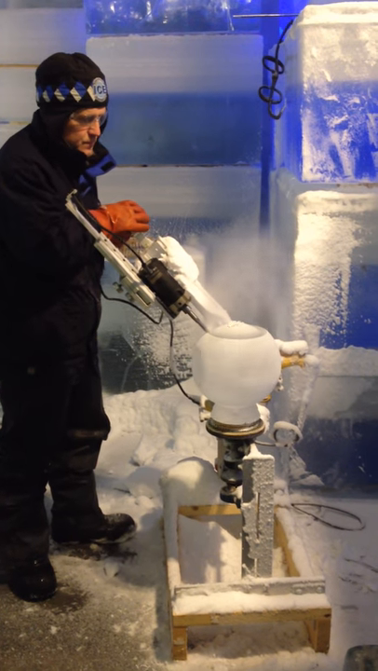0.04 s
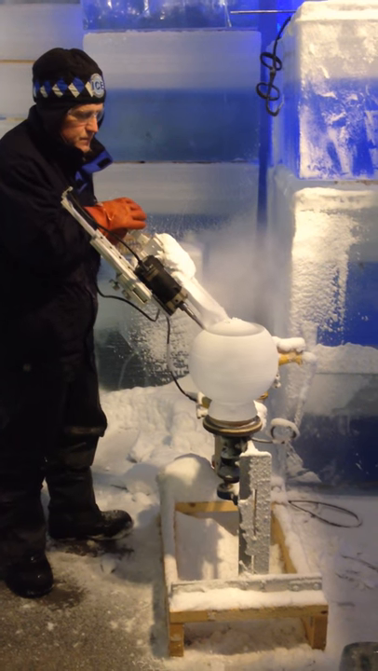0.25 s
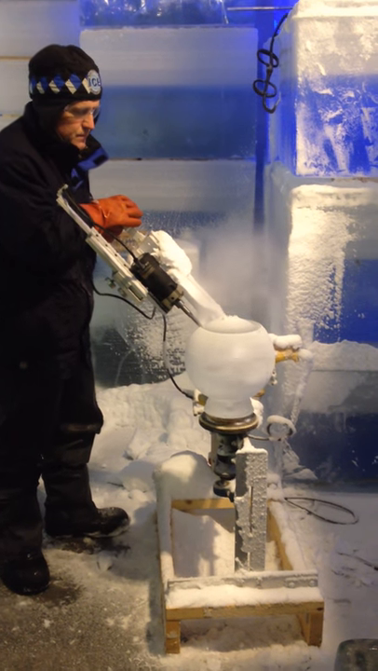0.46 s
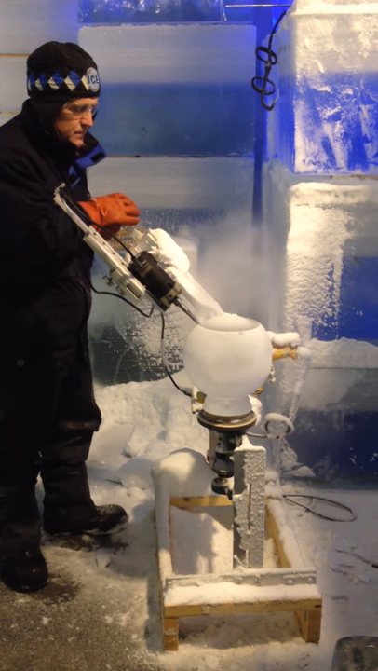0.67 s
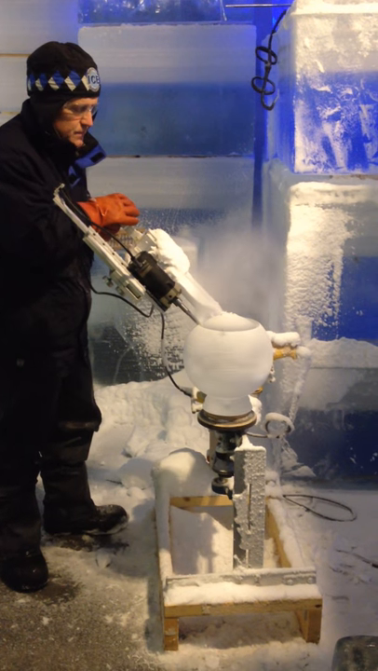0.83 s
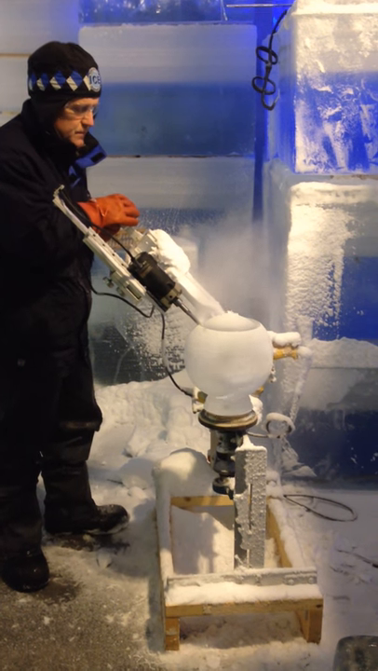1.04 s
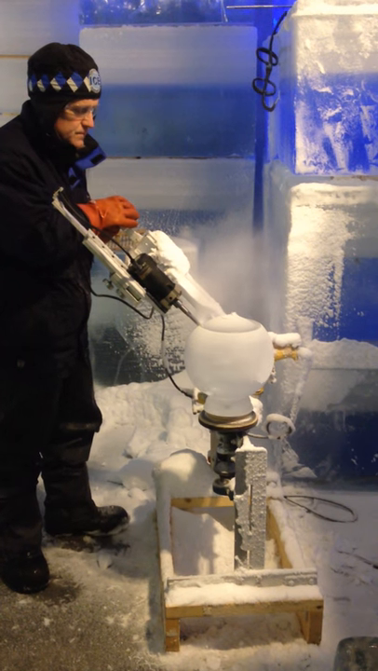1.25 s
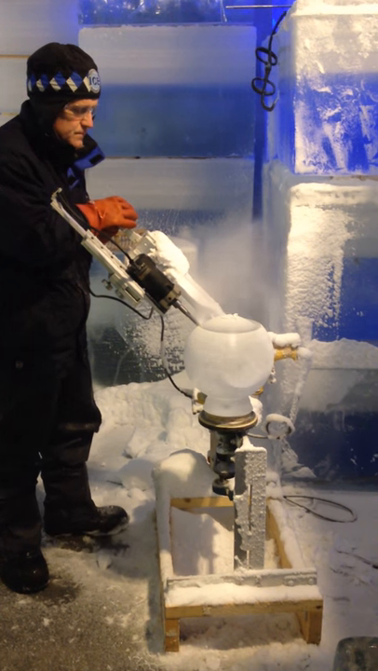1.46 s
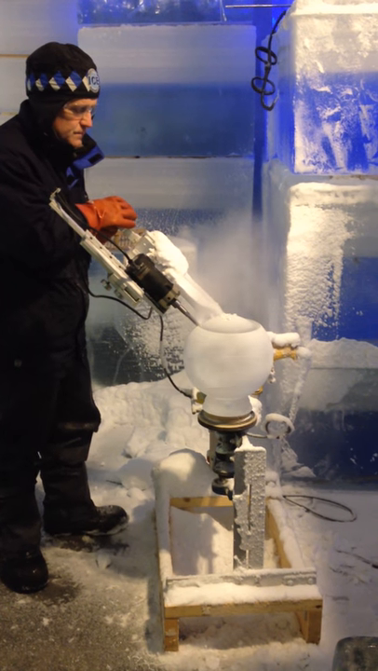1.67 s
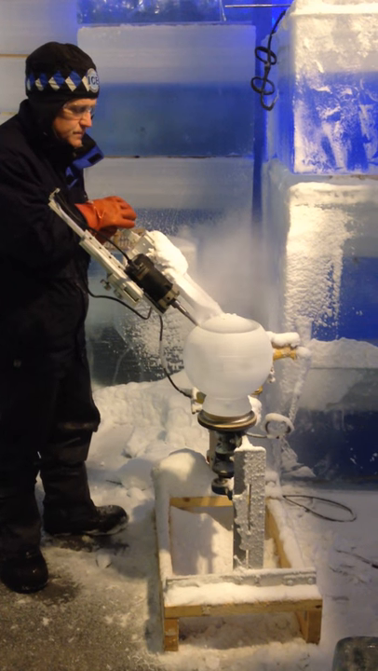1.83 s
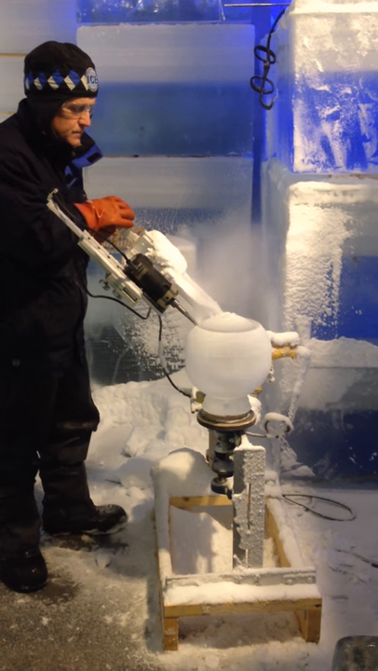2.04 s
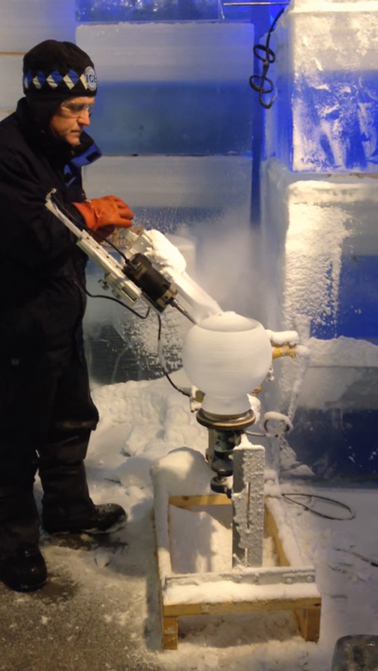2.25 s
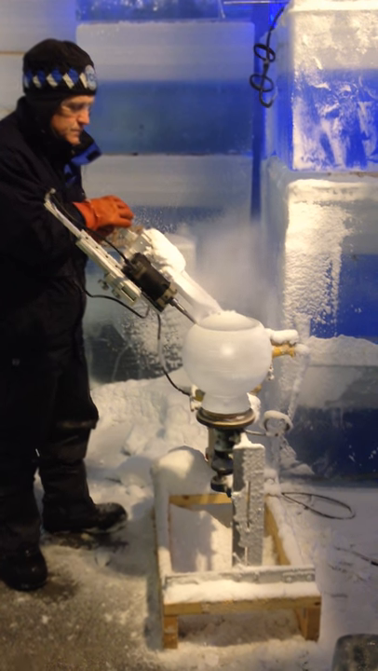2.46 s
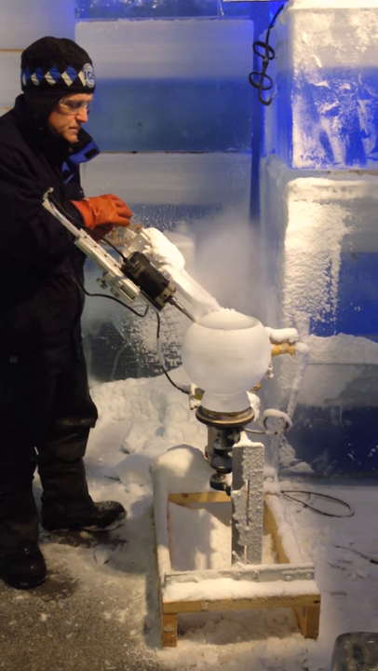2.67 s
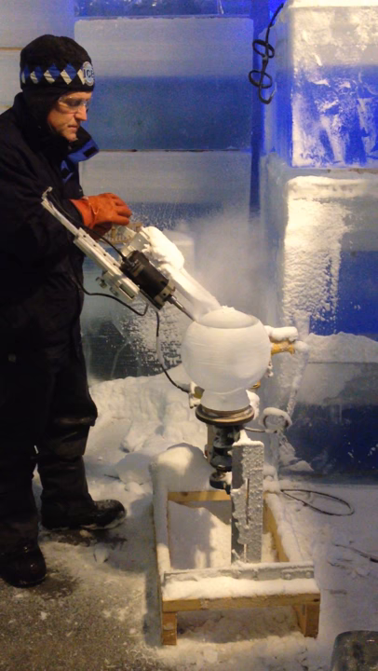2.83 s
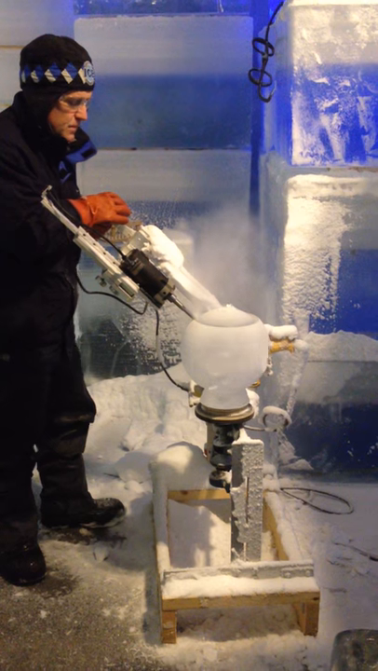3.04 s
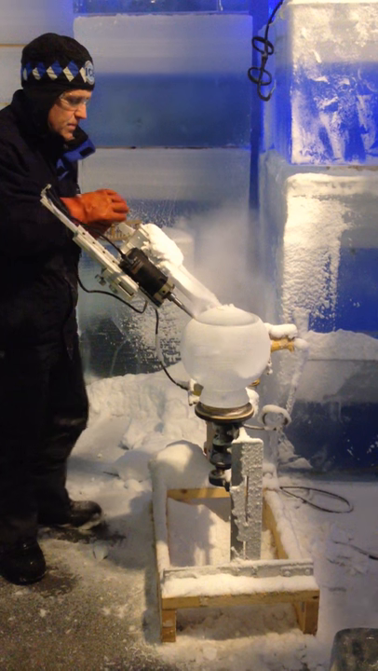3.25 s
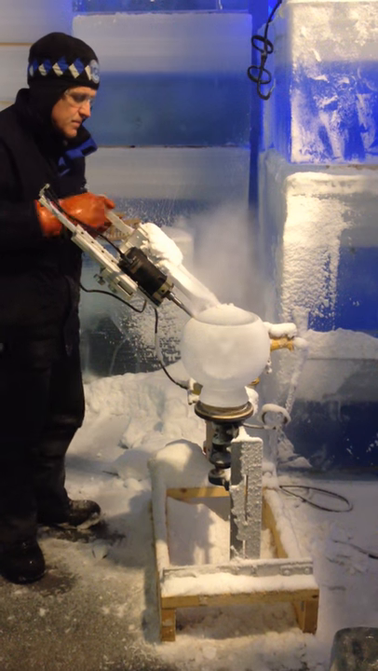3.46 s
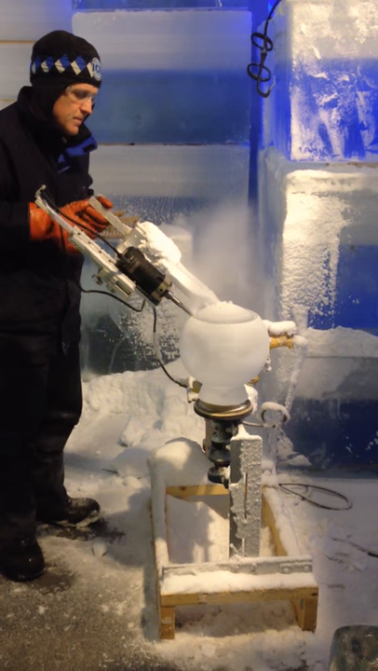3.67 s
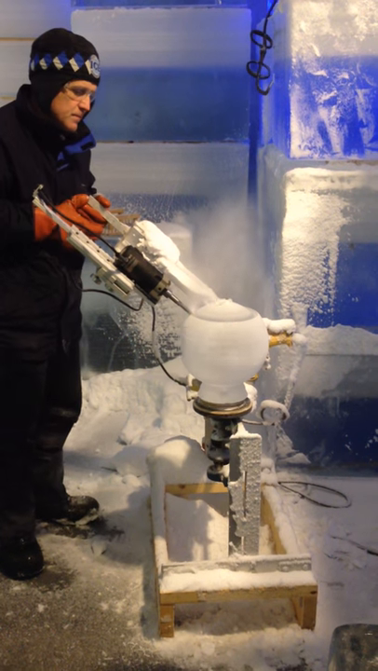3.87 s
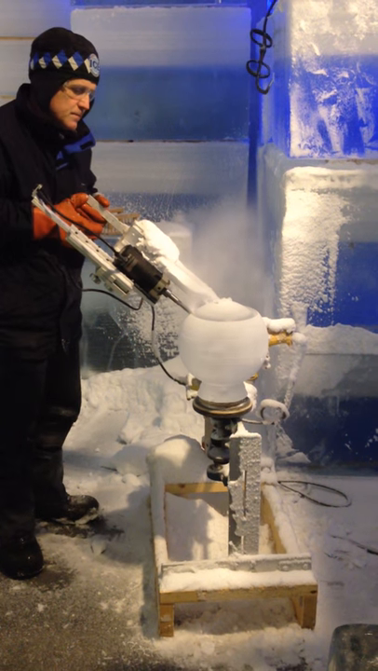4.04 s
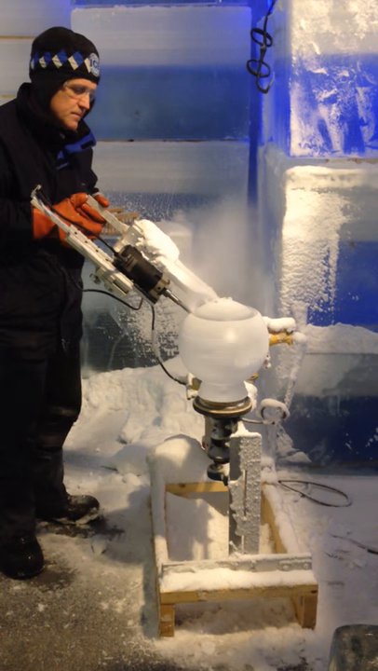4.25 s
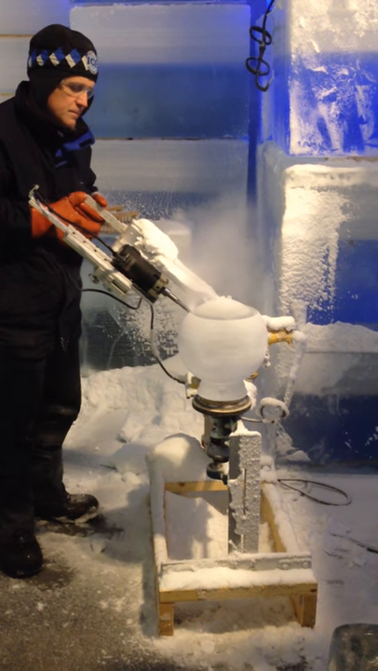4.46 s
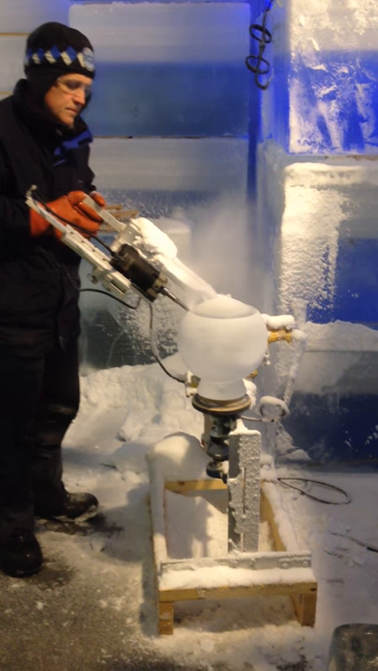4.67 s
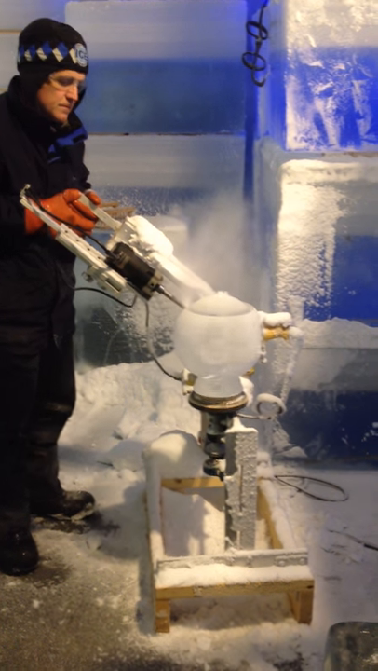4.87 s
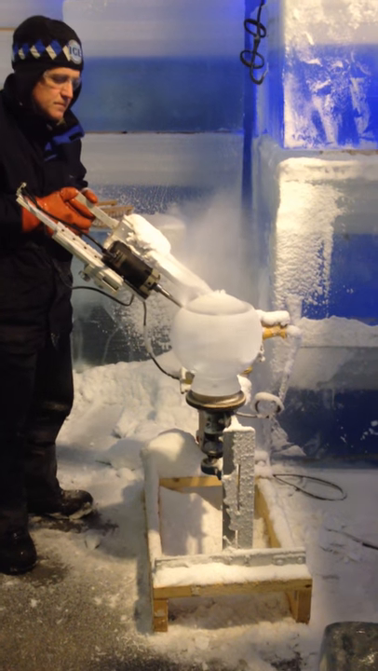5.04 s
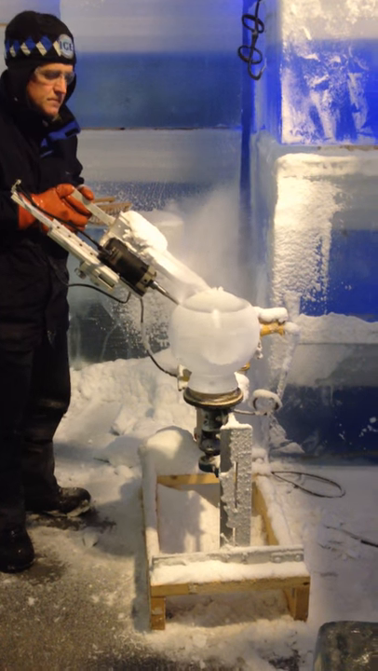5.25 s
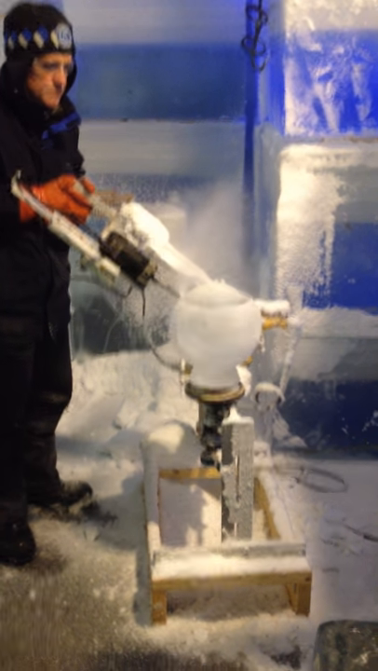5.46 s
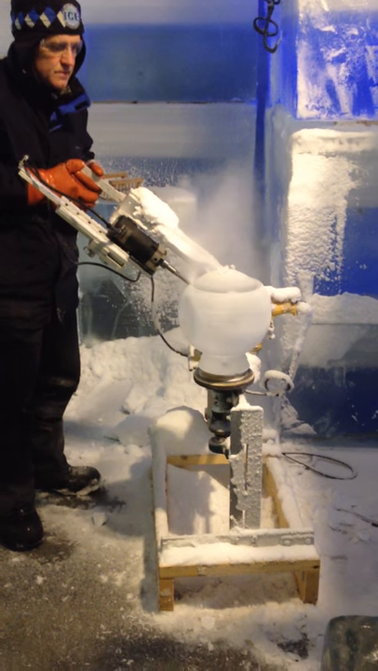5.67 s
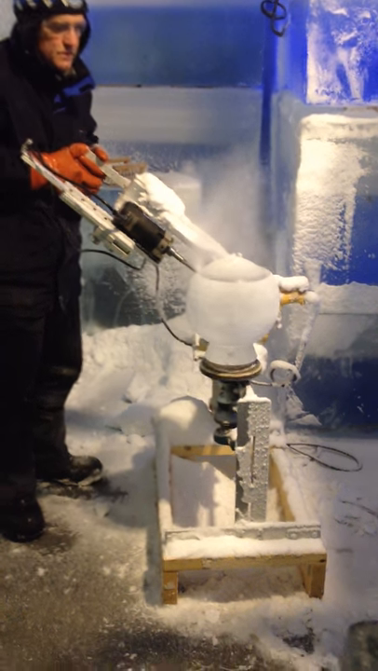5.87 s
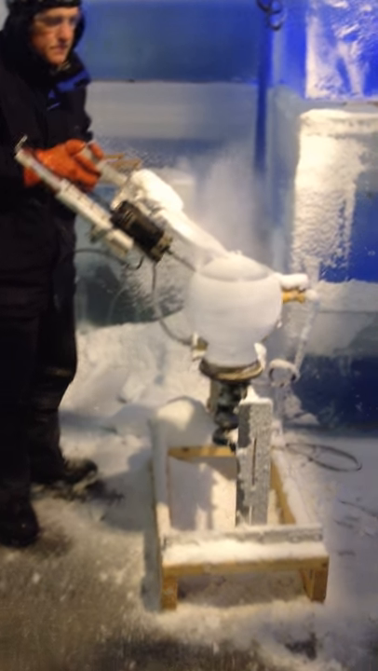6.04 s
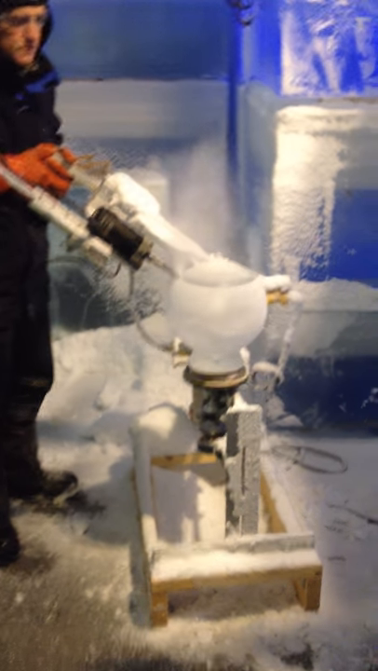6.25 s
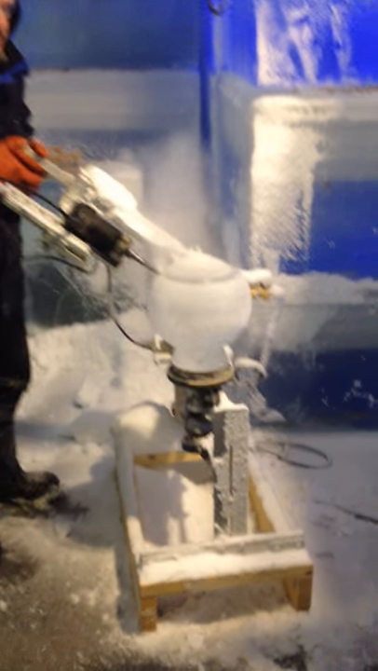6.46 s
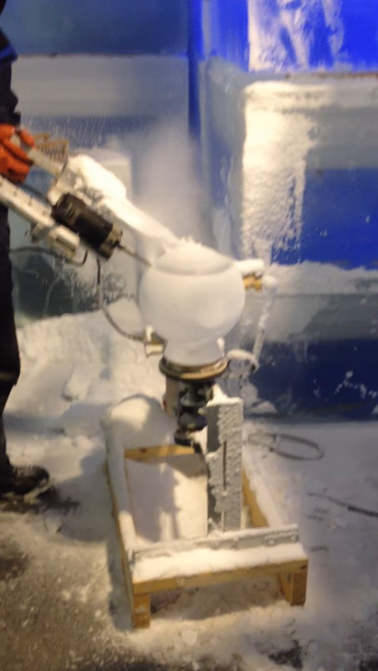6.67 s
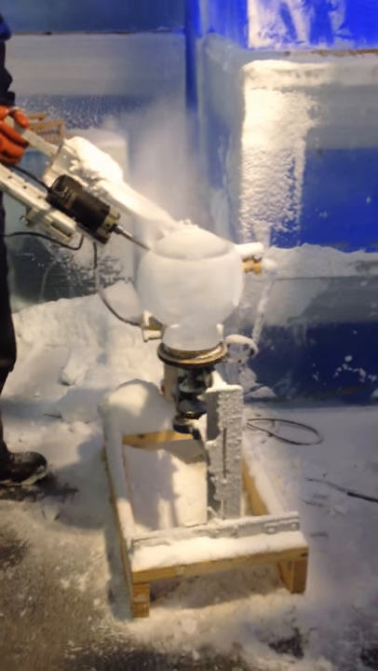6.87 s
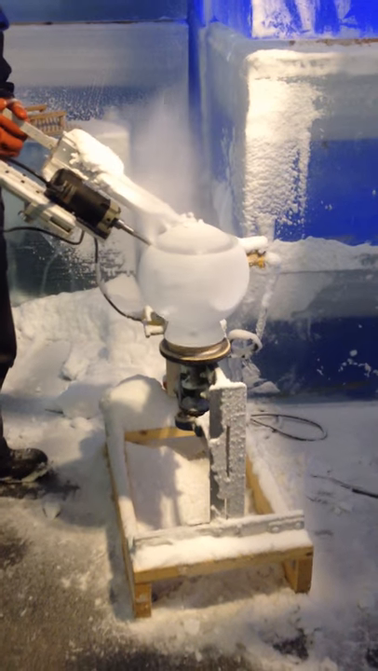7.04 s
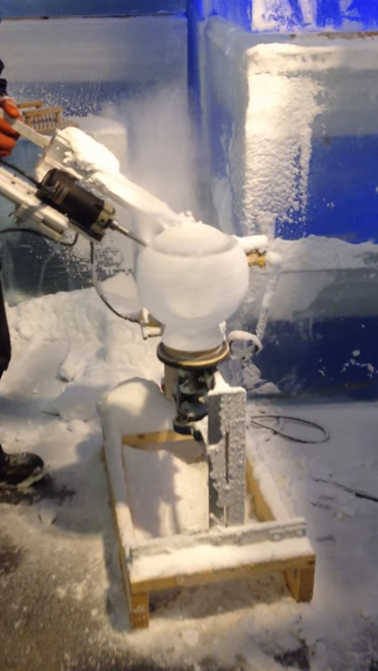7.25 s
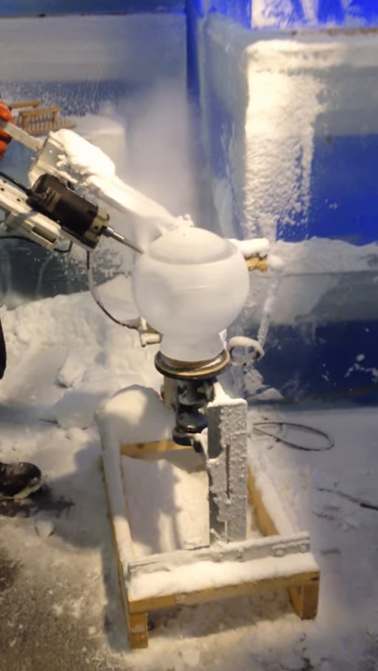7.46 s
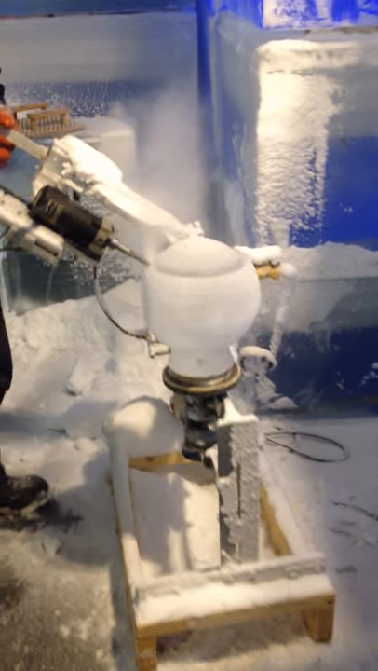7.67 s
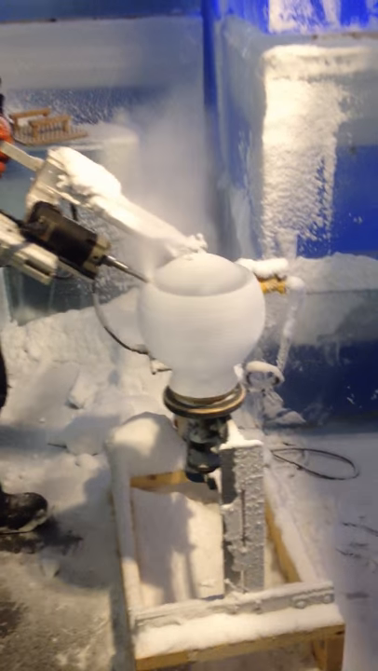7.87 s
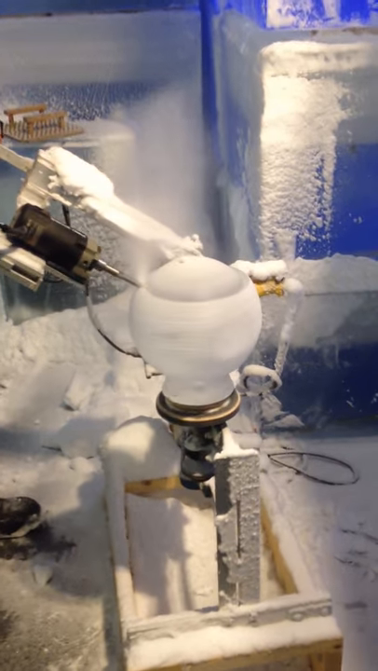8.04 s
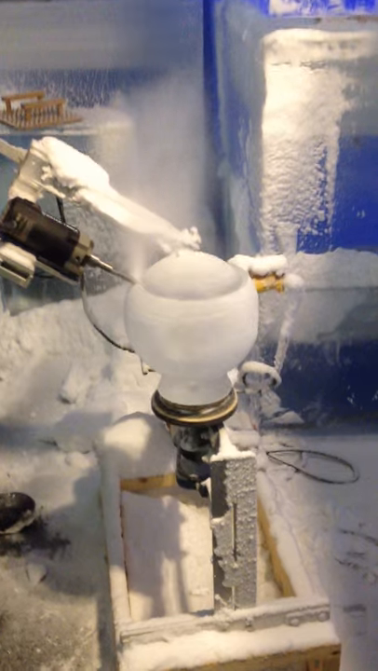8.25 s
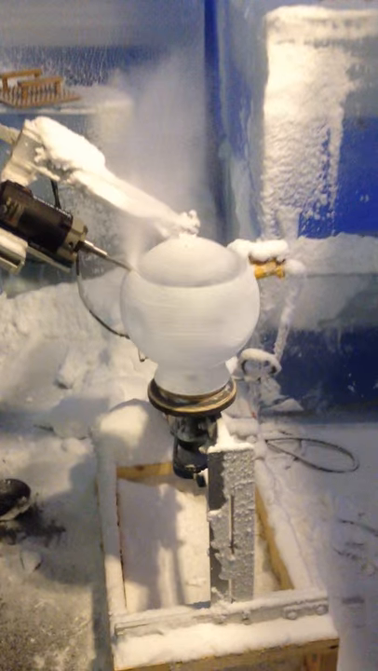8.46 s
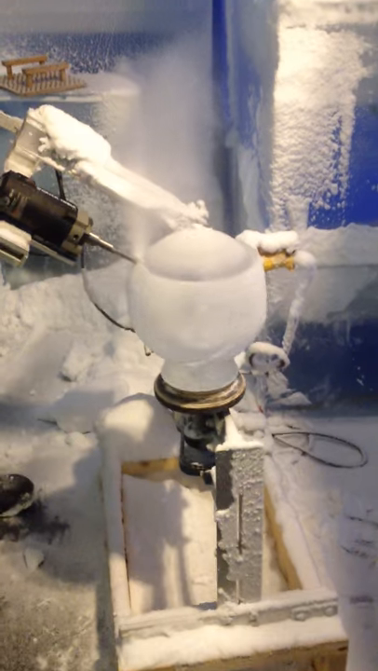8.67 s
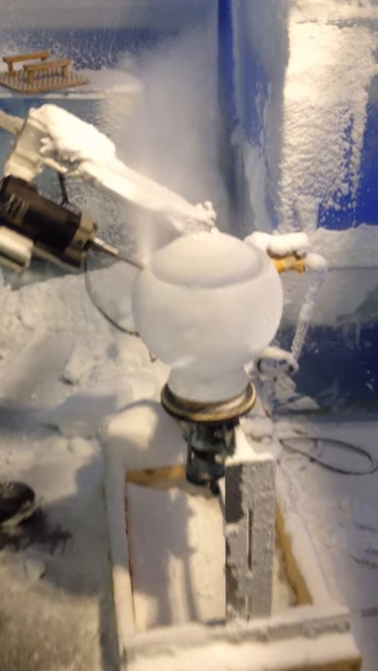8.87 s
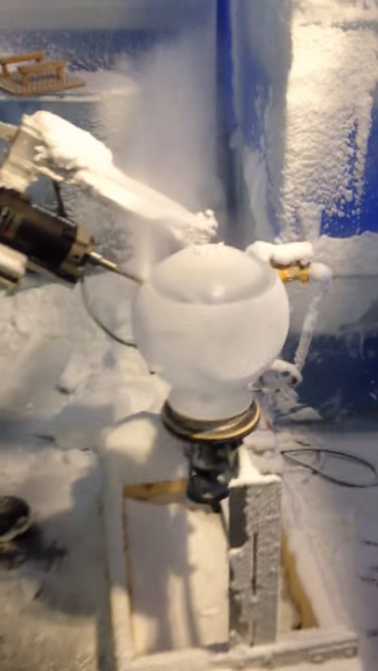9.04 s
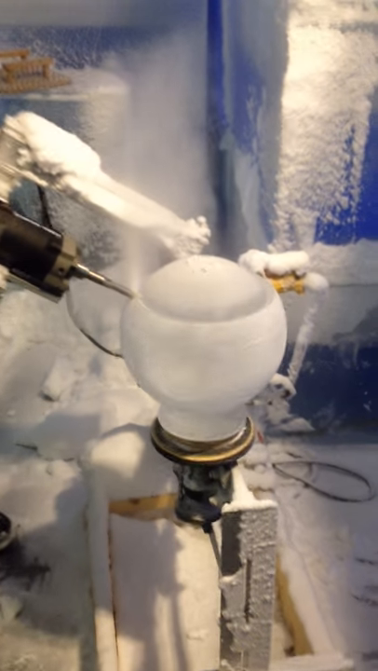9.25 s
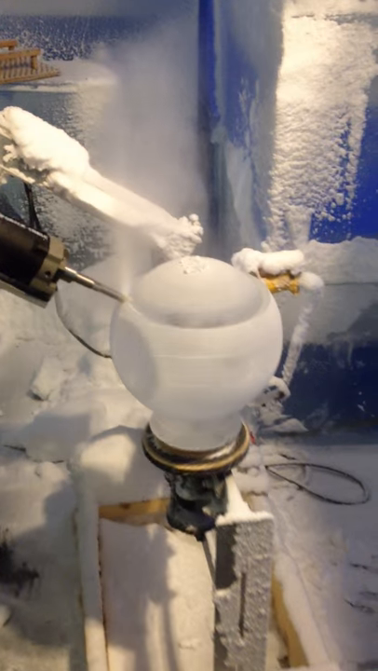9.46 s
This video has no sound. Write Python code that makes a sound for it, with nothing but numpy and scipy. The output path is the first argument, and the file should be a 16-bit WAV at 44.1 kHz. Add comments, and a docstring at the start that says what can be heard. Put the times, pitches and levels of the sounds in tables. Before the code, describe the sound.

A hand-held electric grinder whines without a break as its bit hollows a spinning ball of ice. High overtones flare and fade over a rough cutting roar and the hiss of flying shavings. The pitch sags slightly as the bit presses in. Near the end the microphone comes closer, the hiss grows a little and two fuzzy tones swell. Machinery rumbles faintly in the room.

```python
"""A hand-held mains grinder whines as its long bit hollows a turning ball of ice in a hard-walled cold room.
The shaft radiates at its orders, whole multiples of its speed; torque ripple at twice the mains
frequency adds sidebands. The cut roars and shavings hiss over a low rumble of machinery. Towards the
end the microphone comes nearer, and two narrow, fuzzy tones swell."""
import sys
import numpy as np
from scipy import signal
from scipy.fft import rfft, irfft, next_fast_len
from scipy.io import wavfile
from scipy.ndimage import uniform_filter1d, map_coordinates

SR = 44100
rng = np.random.default_rng(int(sys.argv[2]) if len(sys.argv) > 2 else 0)


def unload_wav(signal):
    """Save mono or channel-first audio to the path in sys.argv[1] as 16-bit WAV at rate SR, clipped to [-1, 1]."""
    wavfile.write(
        sys.argv[1],
        SR,
        np.round(np.clip(np.atleast_2d(signal).T, -1, 1) * 32767).astype(np.int16),
    )


N = 419391

# Spectrum of the machinery. Each row: frequency in Hz, relative level in dB.
RUMBLE_SPECTRUM = [(20, -42), (50, -38), (90, -23.5), (130, -10.5), (190, -8.5), (260, -4), (340, -2),
                   (450, -6), (600, -2), (900, -18.5)]
# Humming modes of the room. Each row: frequency in Hz, width in Hz, base level in dB.
ROOM_MODES = [(230, 10, -61), (354, 6, -58.5), (633.6, 13, -46.5)]
# The hum weakens as the microphone moves. Each row: time in seconds, gain in dB.
ROOM_MODE_GAIN = [(0, 4), (1.2, 0), (2.5, -1.5), (4.2, -0.5), (4.6, -12), (9.51, -7)]
# Two narrow, fuzzy tones. Each row: frequency in Hz, width in Hz.
NARROW_BANDS = [(715, 47), (870, 43)]
# They swell in the last seconds.
# Each row: time in seconds, level of the lower band in dB, level of the upper band in dB.
BAND_LEVELS = [(0, -59, -59), (5.7, -52, -59), (6.2, -46, -41), (6.6, -51, -46), (7.3, -51, -42),
               (7.8, -48, -48), (8.252, -37, -49), (8.5, -42.5, -45), (8.7, -32.5, -56), (8.85, -41, -36),
               (9.1, -41, -40), (9.3, -49, -34.5), (9.51, -43, -47)]
# The ball falls behind when the bit drags on it. Each row: time in seconds, lag in seconds.
BALL_LAG = [(4.3, 0.015), (5.9, 0.3), (7.5, 0.29)]
# Course of the cut. Each row: time in seconds, base level of the roar in dB, that of the spray in dB.
CUT_LEVELS = [(0.0, -27, -33), (1.48, -28, -32.5), (3.84, -27.5, -31.5), (4.8, -28.5, -32),
              (5.3, -29, -32.5), (6.2, -28.5, -31.5), (7.55, -27.5, -30.5), (8.05, -27, -29.5),
              (9.51, -25.5, -27.5)]
# Spectra of tearing ice and of flying shavings. Each row: frequency in Hz, relative level in dB.
ROAR_SPECTRUM = [(300, -54), (500, -13.5), (800, -0.5), (1200, -0.5), (2000, 0.5), (3000, 0), (3900, -2.5),
                 (4600, -2.5), (6000, -15), (9000, -40)]
SPRAY_SPECTRUM = [(2500, -42), (4500, 0), (5500, 2.5), (7500, 2.5), (10000, -1.5), (12800, -1.5),
                  (14500, -1.5), (16000, -7)]
# The bit digs in and rasps. Each row: centre in seconds, width in seconds, gain of the roar in dB.
DIGS = [(0.55, 0.22, 0.5), (3.0, 0.13, -0.2), (6.22, 0.085, 2), (6.75, .12, 0.2), (7.255, 0.083, 1.5)]
# The shaft slows as the bit is pressed in.
# Each row: time in seconds, speed in Hz, base level of the first order in dB.
SHAFT_RUN = [(0.0, 395.9, -39.6), (0.3, 400.0, -52.2), (1.07, 396.0, -41.3), (1.3, 390.8, -40.7),
             (1.42, 390.1, -38.3), (1.6, 392.1, -39.4), (1.87, 391.5, -39.1), (2.25, 397.5, -41.6),
             (2.45, 397.6, -46.1), (2.6, 397.7, -46.9), (2.8, 395.1, -40.8), (3.0, 396.3, -41.6),
             (3.2, 395.1, -39.9), (3.35, 397.5, -42.4), (3.5, 403.2, -46.6), (3.6, 403.3, -51.0),
             (3.75, 399.1, -50.3), (3.82, 398.1, -41.9), (3.95, 396.9, -50.4), (4.17, 394.9, -39.4),
             (4.45, 393.4, -43.5), (4.65, 388.5, -37.6), (4.8, 387.7, -43.7), (5.0, 379.3, -40.7),
             (5.07, 377.9, -35.6), (5.55, 376.7, -38.5), (5.82, 386.1, -45.1), (6.02, 388.4, -45.4),
             (6.27, 389.8, -35.7), (6.5, 388.4, -35.9), (6.77, 389.5, -34.5), (7.0, 386.0, -38.7),
             (7.25, 387.1, -36.3), (7.7, 385.9, -40.8), (8.0, 381.9, -37.0), (8.6, 379.3, -38.5),
             (8.82, 375.1, -39.4), (9.15, 375.0, -40.3), (9.32, 372.9, -40.0), (9.5, 373.5, -43.5)]
# Weak tones. Each row: shaft order, sideband number (0 for the order itself), base level in dB.
WEAK_TONES = [(1, 1, -57), (2, 1, -52), (2, 2, -49), (3, 0, -46), (3, 1, -46), (3, 2, -50), (4, -1, -50),
              (5, 2, -49), (6, -1, -52), (6, 1, -46), (7, 1, -50), (8, -1, -53), (8, 1, -49), (10, 0, -52),
              (11, 0, -54), (12, 1, -54), (13, 0, -55), (14, 0, -53), (16, 0, -50), (17, 0, -55),
              (18, 0, -51), (21, 0, -55), (23, 0, -55), (25, 0, -55), (26, 0, -52.5), (28, 0, -56),
              (29, 0, -54), (36, 0, -54)]
# Loud tones. Each row: shaft order, sideband number.
LOUD_TONES = [(2, 0), (4, 0), (4, 1), (5, 0), (5, 1), (8, 0), (9, 0), (12, 0), (20, 0), (6, 0), (7, 0),
              (24, 0), (32, 0), (1, -1)]
# Each entry: resting level of one loud tone in dB.
LOUD_REST_DB = [-50, -46, -79, -47.1, -43.5, -62, -41.5, -50, -50, -48, -45, -50.5, -54, -58]
# Moments when a tone rings out, one list per loud tone.
# Each row: centre in seconds, width in seconds, nominal peak level in dB.
LOUD_SQUEALS = [
    [(0.55, 0.81, -41), (1.45, 0.22, -41), (3.55, 0.26, -39), (4.85, 0.28, -40), (5.8, 0.69, -41),
     (6.55, 0.12, -37), (6.6, 0.55, -36.5), (7.5, 0.73, -34), (8.05, 0.08, -31), (8.1, 0.82, -34),
     (9.45, 0.32, -40)],
    [(1.6, 0.9, -43), (3.8, 0.85, -39), (4.9, 0.15, -35), (5.7, 0.15, -38), (6.25, 0.69, -36.5),
     (7.3, 0.09, -35), (7.83, 0.22, -29), (7.8, 0.67, -33), (8.45, 1, -40)],
    [(0.6, 0.49, -42), (3.35, 0.32, -42), (4.05, 0.9, -44.8), (5.2, 0.56, -40.2), (6.5, 1, -37.5),
     (6.75, 0.12, -30.5), (7.3, 0.82, -40), (8.15, 0.73, -39), (9.2, 0.24, -33.5), (9.2, 0.65, -37)],
    [(1.0, 0.15, -38.5), (1.2, 0.18, -32), (1.54, 0.08, -35.5), (1.69, 0.11, -34), (1.9, 0.73, -41.5),
     (2.8, 0.9, -39.5), (3.95, 0.12, -33.5), (4.2, 1, -38), (4.9, 0.32, -37), (6.35, 0.089, -36),
     (7.1, 0.57, -40), (7.8, 0.32, -34), (8.3, 0.12, -38.1), (8.65, 0.43, -37)],
    [(0.05, 1, -36), (1.0, 0.29, -42), (1.5, 0.15, -43), (2.1, 0.39, -36), (3.1, 0.91, -39),
     (5.2, 0.8, -41), (5.85, 0.2, -39)],
    [(0.65, 0.32, -38.5), (1.2, 0.32, -40.6), (1.65, 0.11, -36.5), (2.5, 0.45, -42), (3.05, 0.32, -39),
     (3.5, 0.15, -40.4), (6.25, 0.15, -38), (6.75, 0.25, -38), (7.75, 0.43, -44), (8.55, 0.79, -48),
     (9.35, 0.56, -37.5)],
    [(0.35, 1, -36.5), (1.15, 0.99, -37.5), (2.17, 0.18, -35), (2.42, 0.22, -40), (2.97, 0.85, -36),
     (3.65, 0.26, -41), (4.1, 0.22, -42), (4.4, 0.34, -37.5), (6.15, 0.16, -37), (5.15, 0.17, -35.5),
     (5.4, 0.11, -35), (5.45, 1, -39), (5.68, 0.23, -36), (6.77, 0.2, -31.5), (7.0, 0.4, -36),
     (8.05, 0.5, -36.5), (8.45, 0.13, -32), (8.65, 0.72, -35.5), (9.1, 0.77, -37.5)],
    [(0.55, 0.32, -40.5), (1.15, 0.11, -37), (2.35, 0.57, -41.5), (3.1, 0.45, -41.5), (4.8, 0.38, -40),
     (6.3, 0.15, -38), (6.55, 0.55, -41), (6.8, 0.13, -37), (7.65, 0.21, -35), (8.5, 0.15, -36),
     (9.15, 0.3, -38.5)],
    [(1.1, 0.2, -37.5), (2.6, 0.7, -43), (3.1, 0.47, -38.5), (3.9, 0.15, -38.9), (4.15, 0.9, -41.5),
     (6.6, 0.49, -43), (7.25, 0.25, -39), (7.75, 0.22, -42), (8.8, 0.91, -42)],
    [(1.55, 0.082, -38), (5.3, 0.9, -41.5), (6.1, 0.81, -46), (7.2, 0.96, -38.5), (7.75, 0.092, -34),
     (8.0, 1, -40.5)],
    [(0.0, 0.3, -39), (0.55, 0.22, -39), (3.9, 0.3, -40), (4.9, 0.32, -40), (6.95, 0.17, -41.7),
     (8.55, 0.86, -39), (8.7, 0.22, -35), (9.3, 0.72, -38.5)],
    [(1.65, 0.9, -47), (4.1, 0.6, -45), (4.6, 0.9, -46), (6.2, 0.15, -43.3), (7.0, 0.86, -46),
     (7.8, 0.27, -39), (8.25, 0.9, -46), (8.9, 0.15, -36), (9.2, 0.9, -41), (9.5, 0.15, -36)],
    [(0.9, 0.7, -47), (3.9, 0.9, -54), (6.55, 0.22, -46.4), (7.8, 0.45, -48.3), (9.35, 0.9, -45.0)],
    [(0.7, 0.51, -49), (1.6, 1, -51), (3.5, 0.27, -54), (4.8, 0.65, -52), (5.9, 0.27, -50.5),
     (7.4, 1, -50.5)],
]

RIPPLE_HZ, BAND_LIMIT_HZ = 120, 15290
TURN_S, HIGH_SIDE_S = 0.88, 1.165  # one turn of the ball; a moment when its high side meets the bit
TURN_TONES_DB, TURN_SPRAY_DB = 0.5, 0.2  # lift given by the high side
WANDER_DB, WANDER_PER_S = 3, 6  # loud tones drift through the room's standing waves
CHATTER, CHATTER_SIDEBAND, CHATTER_SECOND_ORDER = .1, .2, .15  # random share of a tone's power
FLUTTER_HZ, FLUTTER_DEPTH = 21, .6  # the second order flutters about 21 times a second


def amp(db):
    """Amplitude ratio of a level in dB."""
    return np.exp(np.asarray(db, np.float32) * np.float32(np.log(10) / 20))


def unit(x):
    """Normalisation to rms 1."""
    return x / np.sqrt(np.mean(x ** 2))


def curves(rows):
    """Linear interpolation of each column after the time, one value per sample."""
    times, *columns = np.transpose(rows)
    return [np.interp(np.arange(N) / SR, times, column) for column in columns]


def wobble(rate):
    """Slow random modulation: a spline through Gaussian knots, rate of them a second."""
    knots = rng.standard_normal(int(N * rate / SR) + 4)
    grid = np.arange(0, N + 64, 64)
    coarse = map_coordinates(knots, [grid * rate / SR])
    return np.interp(np.arange(N), grid, coarse).astype(np.float32)


def filtered(x, response):
    """Linear filtering: the spectrum of x is multiplied by a frequency response."""
    size = next_fast_len(N + 8192)
    return irfft(rfft(x, size) * response(np.fft.rfftfreq(size, 1 / SR)), size)[..., :N]


def rush(spectrum, patchy_db):
    """Spectral shaping: coloured noise of rms 1 whose gain varies in patches of time and frequency."""
    cells = signal.stft(rng.standard_normal(N), nperseg=1024)[2]
    patches = uniform_filter1d(rng.standard_normal(cells.shape), size=3, axis=0)
    patches = uniform_filter1d(patches, size=12, axis=1)
    noise = signal.istft(cells * amp(patchy_db * unit(patches)), nperseg=1024)[1][:N]
    hz, db = np.transpose(spectrum)
    return unit(filtered(noise, lambda f: amp(np.interp(np.log(f + 1), np.log(hz), db, -120, -120))))


def narrow_noise(hz, width):
    """Band-pass filtering: noise of rms 1 in one peak, whose width is taken at half amplitude."""
    return unit(filtered(rng.standard_normal(N), lambda f: 1 / (1 + (2 * (f - hz) / width) ** 2)))


def room_rumble():
    """Room resonance: steady machinery fills the room with a rumble and hums in its modes."""
    hum = sum(amp(db) * narrow_noise(hz, width) for hz, width, db in ROOM_MODES)
    rumble = amp(-47.5) * rush(RUMBLE_SPECTRUM, patchy_db=1.5)
    return rumble + amp(curves(ROOM_MODE_GAIN)[0]) * hum


def narrow_bands():
    """Narrow-band noise is heard as pitch: fuzzy tones near 715 and 870 Hz swell in the last seconds."""
    levels_db = curves(BAND_LEVELS)
    return sum(amp(db) * narrow_noise(hz, width) for (hz, width), db in zip(NARROW_BANDS, levels_db))


def ball_pressure():
    """Periodic loading: the out-of-round ball presses on the bit twice a turn, 1 at its high side."""
    angle = 2 * np.pi * (np.arange(N) / SR - curves(BALL_LAG)[0] - HIGH_SIDE_S) / TURN_S
    return (np.cos(angle) + np.cos(2 * angle)) / 2


def ice_cut():
    """Fracture noise: the bit tears the ice with a broadband roar and throws a hissing spray of shavings."""
    t = np.arange(N) / SR
    roar_db, spray_db = curves(CUT_LEVELS)
    bite = wobble(6.5)
    dig_db = sum(db * np.exp(-(2 * (t - centre) / width) ** 2) for centre, width, db in DIGS)
    roar_db += dig_db + .3 * bite
    spray_db += .5 * dig_db + TURN_SPRAY_DB * ball_pressure() + .16 * bite + .34 * wobble(13)
    roar = amp(roar_db) * rush(ROAR_SPECTRUM, patchy_db=1.5)
    spray = amp(spray_db) * rush(SPRAY_SPECTRUM, patchy_db=1.85)
    return roar + spray


def grinder_whine():
    """Rotational harmonics: the shaft sounds its orders; modulation by torque ripple adds sidebands."""
    t = np.arange(N) / SR
    speed_hz, first_order_db = curves(SHAFT_RUN)
    shaft_angle = 2 * np.pi * (np.cumsum(speed_hz) / SR % 1)
    ripple_angle = 2 * np.pi * (RIPPLE_HZ * t % 1)

    def tone(order, sideband, size, chatter):
        """Phasor sum of a steady part and a random part that varies faster at higher orders."""
        rate = 36 + 1.5 * order
        in_phase = np.sqrt(2 - 2 * chatter) + np.sqrt(chatter) * wobble(rate)
        quadrature = np.sqrt(chatter) * wobble(rate)
        phase = order * shaft_angle + sideband * ripple_angle + rng.uniform(0, 2 * np.pi)
        return size * (in_phase * np.sin(phase) + quadrature * np.cos(phase))

    whine = tone(order=1, sideband=0, size=amp(first_order_db - .4 + .7 * wobble(7)), chatter=.02)
    turn_db = TURN_TONES_DB * ball_pressure()
    flutter_angle = 2 * np.pi * np.cumsum(FLUTTER_HZ * (1 + .3 * wobble(8))) / SR
    for (order, sideband), rest_db, squeals in zip(LOUD_TONES, LOUD_REST_DB, LOUD_SQUEALS):
        size = amp(rest_db + turn_db + WANDER_DB * wobble(WANDER_PER_S))
        for centre, width, db in squeals:
            span = slice(max(0, round((centre - width) * SR)), round((centre + width) * SR))
            arch = np.cos(np.pi / 2 * (t[span] - centre) / width) ** 2
            squeal = amp(db) * np.clip(1.6 * arch - .35, 0, 1)
            size[span] = np.maximum(size[span], squeal)
        sway_db = .6 * wobble(11)  # short waves flare and drop as hands and tool sway
        chatter = CHATTER_SIDEBAND if sideband > 0 else CHATTER
        if order == 2:
            size *= (1 + FLUTTER_DEPTH * np.sin(flutter_angle)) / np.sqrt(1 + FLUTTER_DEPTH ** 2 / 2)
            chatter = CHATTER_SECOND_ORDER
        whine += tone(order, sideband, size * amp(sway_db), chatter)

    spray_db = curves(CUT_LEVELS)[1]
    nearer_db = 1.1 * (spray_db - np.mean(spray_db))
    for order, sideband, db in WEAK_TONES:
        swell_db = 3 * wobble(6)
        if sideband == 0 or order > 3:  # the low sidebands do not grow with the cut
            swell_db += nearer_db + turn_db
        whine += tone(order, sideband, amp(db + swell_db), CHATTER_SIDEBAND if sideband else CHATTER)
    return whine


def scene():
    """Superposition: grinder, cut, fuzzy tones and room add at one microphone."""
    return (grinder_whine() + ice_cut() + narrow_bands() + room_rumble())[None]


def record(dry):
    """Ideal low-pass filtering: nothing passes above the band limit."""
    return filtered(dry, lambda hz: hz < BAND_LIMIT_HZ)


dry = scene()
out = record(dry)
unload_wav(out)
```